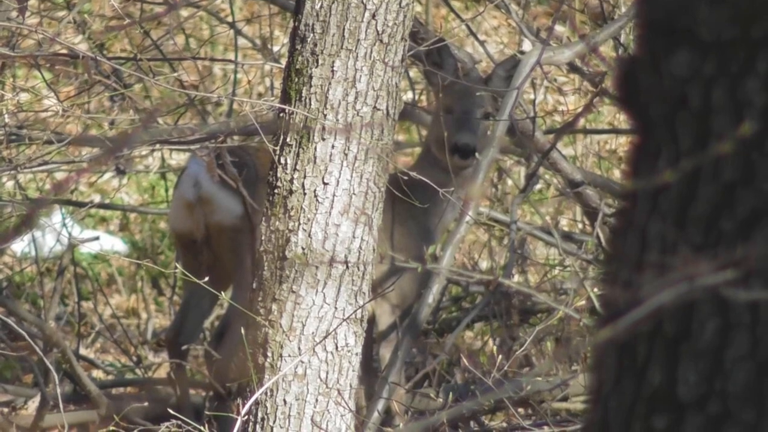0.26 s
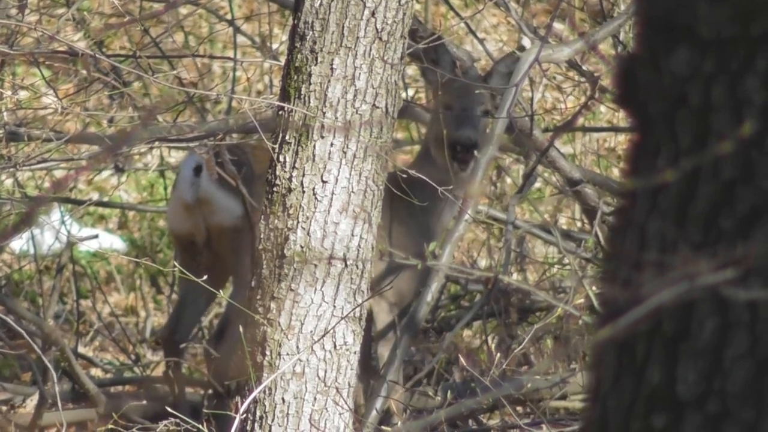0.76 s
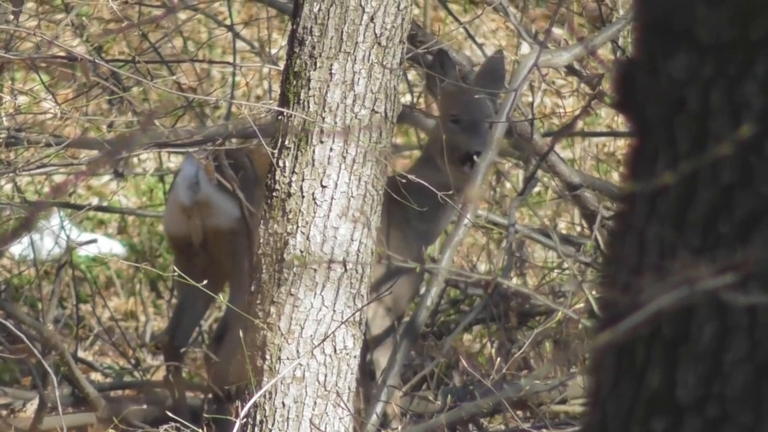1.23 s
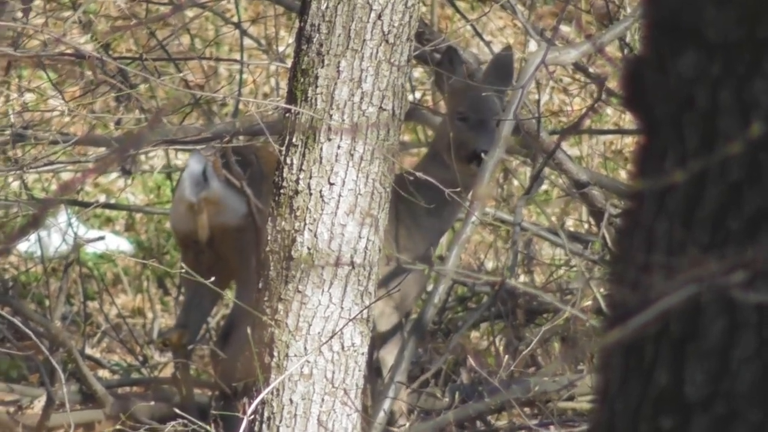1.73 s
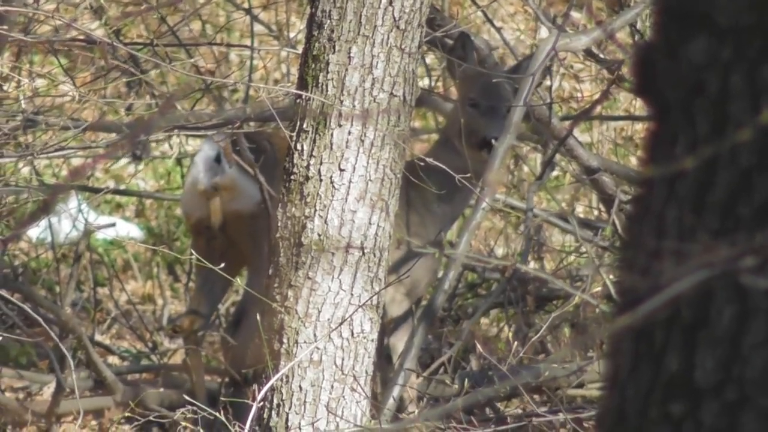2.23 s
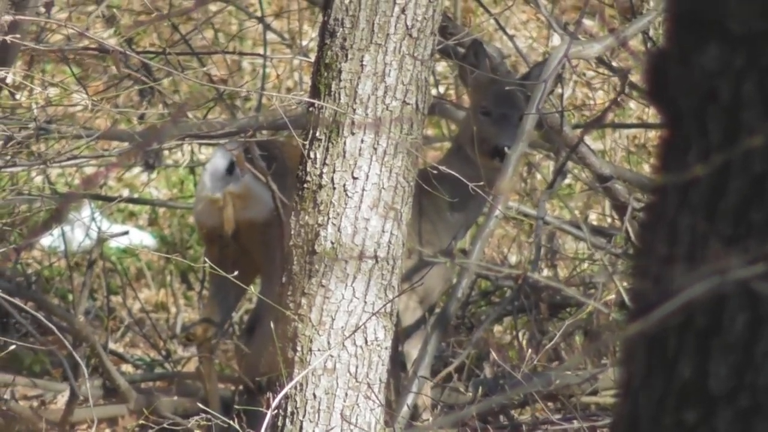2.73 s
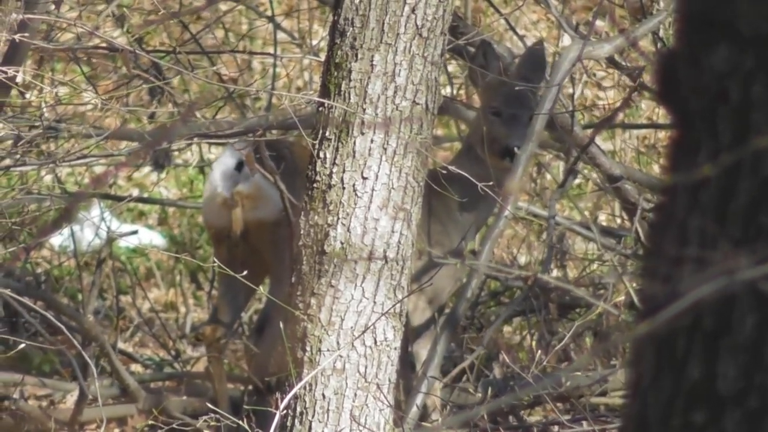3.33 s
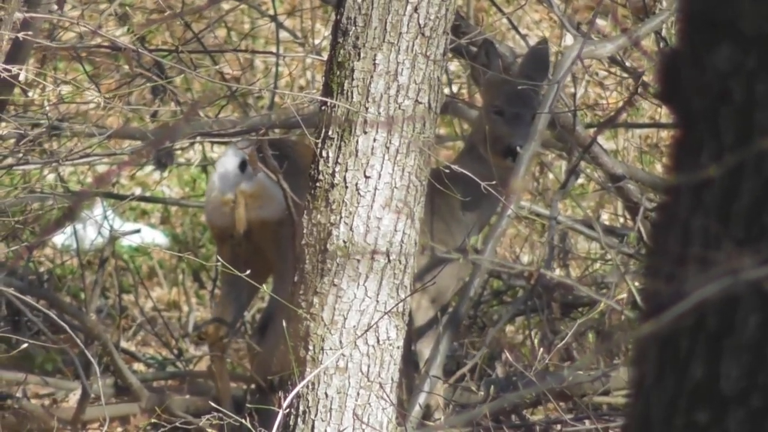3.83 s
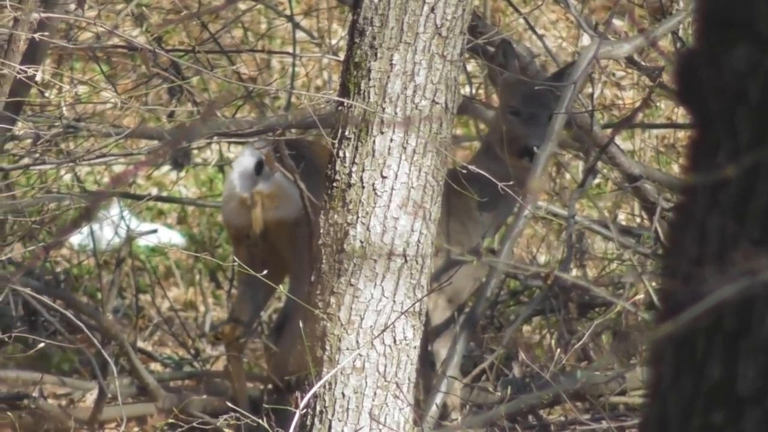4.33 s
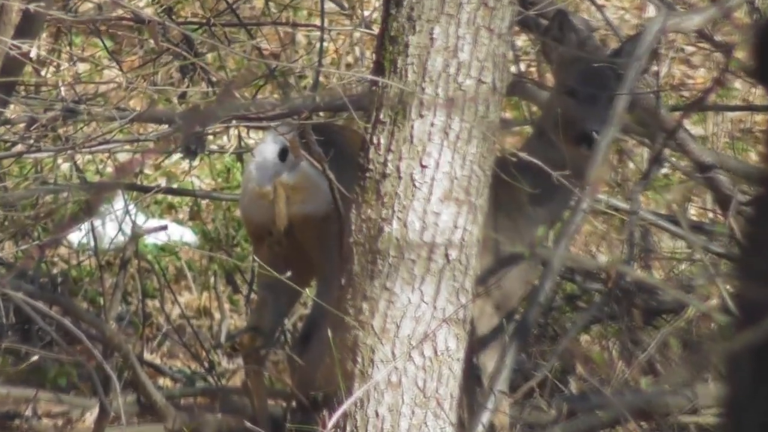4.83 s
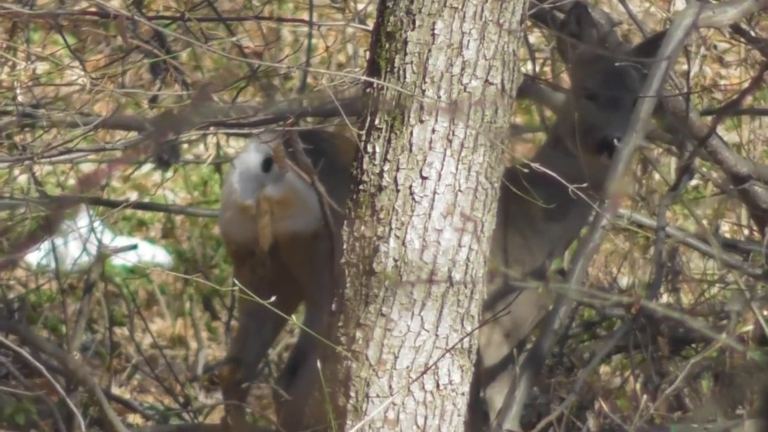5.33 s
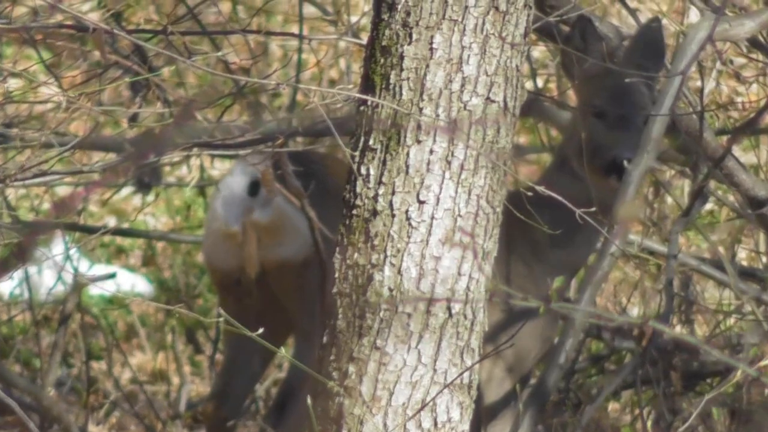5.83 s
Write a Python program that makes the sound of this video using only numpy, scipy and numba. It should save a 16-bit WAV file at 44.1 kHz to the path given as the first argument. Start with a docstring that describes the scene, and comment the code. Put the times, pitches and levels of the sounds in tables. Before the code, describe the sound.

Outdoor camera microphone, quiet background of gentle air and steady hiss. A harsh, dog-like deer bark bursts out nearby early on, its tail spreading through the trees. A more distant deer replies four times, hollow and blurred, at irregular gaps, the last near the end. Tiny bird whistles fall in threes, ending on a nasal note. Small dry camera clicks sit close; late on, a short motor whirr and rapid tiny ticks.

```python
"""Soft air and microphone hiss run throughout, as filtered noise; a small bird's swept sine tones come and go.
After a second a near roe deer grunts and barks once in a bare wood: uneven glottal pulses and air ring its throat.
A camera then clicks now and again, and from 2.3 s a further deer answers four times, mostly as echo.
Around 4.5 s the lens motor whirrs, then the lens steps evenly; clicks, ticks and steps are coloured noise snaps.
Random trunk echoes with a frequency-dependent decay scatter the deer and the bird."""
import sys
import numpy as np
from scipy import signal
from scipy.fft import rfft, irfft
from scipy.io import wavfile
from scipy.ndimage import uniform_filter1d
from numba import njit

SR = 44100
rng = np.random.default_rng(int(sys.argv[2]) if len(sys.argv) > 2 else 0)


def generate_wav(signal):
    """Clip the signal to [-1, 1] and save it as 16-bit WAV at the path in sys.argv[1]."""
    frames = np.transpose(np.atleast_2d(signal))
    scaled = np.clip(frames, -1, 1) * 32767
    pcm = np.round(scaled).astype(np.int16)
    wavfile.write(sys.argv[1], SR, pcm)


N = 268128


def undb(db):
    """Decibels to amplitude gain."""
    return 10 ** (np.asarray(db) / 20)


def unit(x):
    """Scale to rms 1."""
    return x / np.sqrt(np.mean(x ** 2) + 1e-30)


def curve(rows):
    """Rows (time [s], value) joined by straight lines."""
    return np.interp(np.arange(N) / SR, *np.transpose(rows))


def over_hz(points, size):
    """Rows (frequency [Hz], value) read on the FFT grid, linear in log frequency."""
    hz, value = np.transpose(points)
    grid_hz = np.arange(size // 2 + 1) * SR / size
    return np.interp(np.log(grid_hz + 1), np.log(hz), value)


def colour(x, points):
    """Filter by a spectrum of rows (frequency [Hz], gain [dB])."""
    size = x.shape[-1]
    return irfft(rfft(x) * undb(over_hz(points, size)), size)


def add(track, start_s, sound):
    """Mix a sound into a track, cut at the track's end."""
    i = max(int(start_s * SR), 0)
    part = sound[:max(N - i, 0)]
    track[i:i + len(part)] += part


def wobble(size, rate_hz):
    """Random knots at a given rate joined by straight lines, spread near 1."""
    return np.interp(np.arange(size) / SR * rate_hz, np.arange(2000), rng.standard_normal(2000))


# side against mid: (frequency [Hz], gain [dB])
SIDE_COLOUR = [(30, -8), (120, 1), (500, 1.5), (2000, -12), (4500, -46), (7500, -12), (12000, -2)]


def stereo_noise(points):
    """Coloured noise, wide in the bass and the top, narrow between."""
    mid, side = unit(colour(rng.standard_normal((2, N)), points))
    side = colour(side, SIDE_COLOUR)
    return np.array([mid + side, mid - side])


# air spectrum: (frequency [Hz], relative density [dB])
AIR_COLOUR = [(15, -24), (25, -14.5), (59, -4.5), (92, -6.5), (149, -6.5), (294, -11), (331, -9.5),
              (397, -12), (724, -12.5), (1640, -28), (3000, -48), (3900, -54), (6600, -120)]
# hiss spectrum: (frequency [Hz], relative density [dB])
HISS_COLOUR = [(1500, -22.5), (1950, 8), (2600, -2.5), (3600, 4), (5000, -5.5), (6500, 1.5), (7900, 6.5),
               (10000, 2), (15500, 0)]
# swell of both, mean removed in use: (time [s], level [dB])
BACKGROUND_SWELL = [(0.0, -75.5), (0.81, -76), (1.85, -71.5), (2.45, -73.5), (2.73, -72.5), (6.08, -74)]


def background():
    """Soft moving air among the trees and the microphone's hiss, swelling together."""
    air_db, hiss_db, air_follows = -65, -68, 0.88
    swell_db = curve(BACKGROUND_SWELL)
    swell_db = swell_db - np.mean(swell_db)
    air_level_db = air_db + air_follows * swell_db + 0.76 * wobble(N, 4.7)
    air = stereo_noise(AIR_COLOUR) * undb(air_level_db)
    return air + stereo_noise(HISS_COLOUR) * undb(hiss_db + swell_db)


# tail bands: (frequency [Hz], t60 [s], level [dB])
WOOD_BANDS = [(150, 0.99, 2), (408, 2.96, 3), (663, 2.37, 4), (885, 2.36, -4), (1240, 2.37, -0.5),
              (2220, 1.61, 1.5), (3940, 0.99, -10), (9000, 0.34, 1.5)]


def wood(x, direct_db, early_db, early_s, tail_db, build_s, width, beam_db=0):
    """Direct sound, scatter off the nearest trunks, then a long tail that loses its treble first."""
    size = 2 * SR
    t = np.arange(size) / SR
    # trunk echoes of very unequal strength, as mid and side
    echoes = unit(rng.standard_normal((2, size)) * rng.random((2, size)) ** 8)
    spectrum = rfft(echoes)
    band_hz, t60s, band_dbs = np.transpose(WOOD_BANDS)
    # a mouth facing the listener sends less of its upper range into the trees
    band_dbs = band_dbs - beam_db * np.clip((band_hz - 650) / 250, 0, 1)
    tail = 0
    for share, t60, band_db in zip(np.eye(len(t60s)), t60s, band_dbs):
        band = irfft(spectrum * over_hz(np.column_stack([band_hz, share]), size), size)
        tail = tail + undb(band_db) * band * np.exp(-np.log(1000) * t / t60)
    tail = tail * (1 - np.exp(-t / build_s))
    early = echoes * np.exp(-t / early_s) * np.sqrt(2 / early_s)
    mid, side = (undb(early_db) * early + undb(tail_db) * tail) / np.sqrt(SR)
    mid[0] += undb(direct_db)
    response = np.array([mid + width * side, mid - width * side])
    return signal.fftconvolve(x[None], response, axes=1)[:, :N]


def whistle(length_s, glide_hz):
    """A thin, slightly quavering tone bending through start, middle and end pitch."""
    u = np.linspace(0, 1, int(length_s * SR))
    hz = np.polyval(np.polyfit([0, .5, 1], glide_hz, 2), u)
    hz = hz * (1 + 0.0098 * wobble(len(u), 689))
    envelope = np.abs(np.sin(np.pi * u)) ** 0.52
    tone = unit(envelope * np.sin(2 * np.pi * np.cumsum(hz) / SR))
    return undb(2.25 * wobble(len(u), 74)) * tone


# nasal note: (multiple of the fundamental, level [dB])
NASAL_MIX = [(5, -3), (8, 4), (9, -1.5), (10, 0)]


def nasal():
    """A nearly level note of a few high partials, its pitch arching a little."""
    length_s, peak_hz = 0.105, 754.7
    arch = np.abs(np.sin(np.linspace(0, np.pi, int(length_s * SR)))) ** .5
    phase = 2 * np.pi * np.cumsum(peak_hz * (1 + 0.0447 * (arch - 1))) / SR
    partials = sum(undb(db) * np.sin(round(k) * phase) for k, db in NASAL_MIX)
    return unit(arch * partials)


# falling whistles, pitches before the song's factor:
# (time into unstretched song [s], length [s], start [Hz], middle [Hz], end [Hz], level re song [dB])
SONG_WHISTLES = [(0, .115, 7760, 6890, 6490, -1), (0.168, .118, 7520, 6760, 6220, -0.5),
                 (0.352, .073, 7150, 6600, 5200, -1)]
# songs: (time [s], level before wood [dB], whistle pitch factor, note spacing factor)
SONG_TIMES = [(1.152, -63.5, .98, 1.0), (2.352, -63, 1.03, 0.95), (4.997, -60, 1.0, 1.02),
              (5.875, -60, 0.99, 1.03)]
# rising contact calls: (time [s], middle pitch [Hz], level before wood [dB])
CONTACT_PEEPS = [(.002, 7800, -75), (.317, 8000, -70), (.62, 8460, -71), (3.655, 7560, -61.5)]


def bird():
    """Songs of three falling whistles and a nasal note; rising peeps before the first, one between later songs."""
    nasal_after_s, nasal_db = .517, -1
    peep_length_s, peep_rise = .065, 0.02  # rise: share of the pitch either side of the middle
    out = np.zeros(N)
    for start_s, db, pitch, stretch in SONG_TIMES:
        for after_s, length_s, *glide_hz, note_db in SONG_WHISTLES:
            note = whistle(length_s, pitch * np.array(glide_hz))
            add(out, start_s + stretch * after_s, undb(db + note_db) * note)
        add(out, start_s + stretch * nasal_after_s, undb(db + nasal_db) * nasal())
    for start_s, hz, db in CONTACT_PEEPS:
        glide_hz = hz * (1 + peep_rise * np.array([-1, 0, 1]))
        add(out, start_s, undb(db) * whistle(peep_length_s, glide_hz))
    return wood(out, direct_db=-7, early_db=-13.0, early_s=0.013, tail_db=9.5, build_s=0.03, width=0.021)


@njit
def svf(x, hz, width_hz):
    """State-variable band-pass with a moving centre, gain 1 there."""
    y, band, low = np.empty(len(x)), 0., 0.
    for i in range(len(x)):
        g, k = np.tan(np.pi * hz[i] / SR), width_hz / hz[i]
        v = (band + g * (x[i] - low)) / (1 + g * (g + k))
        band, low, y[i] = 2 * v - band, low + 2 * g * v, k * v
    return y


def resonate(x, hz, width_hz):
    """A resonance applied twice, for steep skirts."""
    centre_hz = np.minimum(hz * np.ones(len(x)), SR / 2 - 2000)
    once = svf(x, centre_hz, float(width_hz))
    return svf(once, centre_hz, float(width_hz))


# throat opening before a bark:
# (time [s], length [s], level before wood [dB], centre [Hz], width per pass [Hz])
GRUNT_PUFFS = [(1.005, 0.035, -45.5, 820, 450), (3.898, 0.12, -58, 246, 170),
               (5.712, 0.095, -53.5, 258, 224)]


def grunts():
    """Short rough puffs, band-passed noise, that lead into barks."""
    out = np.zeros(N)
    for start_s, length_s, db, hz, width_hz in GRUNT_PUFFS:
        size = int(length_s * SR)
        puff = resonate(rng.standard_normal(SR)[:size], hz, width_hz) * np.hanning(size)
        add(out, start_s, undb(db) * unit(puff))
    return wood(out, direct_db=-9.5, early_db=-9.5, early_s=0.17, tail_db=-9, build_s=0.061, width=0.17)


def bark(row, throat, pitch_hz, chest_db, release_s, first_width_hz, jaw_drop, jitter, rasp, growl_db):
    """Uneven glottal pulses and puffs of air ring the throat while the jaw opens and closes."""
    _, length_s, db, first_hz, upper_db, attack_s = row
    size = int(length_s * SR)
    t = np.arange(size) / SR
    jaw = np.sin(np.pi * (t / length_s) ** .85)
    fold_hz = pitch_hz * (.95 + .06 * jaw) * (1 + jitter * wobble(size, 400))
    phase = np.cumsum(fold_hz) / SR
    pulses = np.diff(np.floor(phase), prepend=0)
    pulses = unit(pulses * undb(2.2 * wobble(size, 143.5)))
    # air hisses while the folds are open, afresh at every narrowing of the throat
    air = rng.standard_normal((len(throat) + 2, SR))[:, :size]
    puffs = air * np.exp(-(phase % 1) / 0.73)
    first, low, *upper = pulses + rasp * unit(puffs)
    # starts as a rasp; the first resonance blooms later and sinks as the jaw closes
    bloom = undb(-7 * np.clip(1 - t / 0.081, 0, 1))
    voice = bloom * resonate(first, first_hz * (1 - jaw_drop * (1 - jaw)), first_width_hz)
    for source, (hz, width_hz, mode_db) in zip(upper, throat):
        voice += undb(mode_db + upper_db) * resonate(source, hz * (0.948 + 0.062 * jaw), width_hz)
    # steady lung pressure evens out the loudness
    voice /= np.sqrt(uniform_filter1d(voice ** 2, size=900) + 1e-18)
    # fundamental and low growl come through the chest wall
    growl = unit(resonate(low, 244, 460))
    chest = unit(np.sin(2 * np.pi * phase)) + undb(growl_db) * growl
    effort = np.clip(t / attack_s, 0, 1) * np.clip((length_s - t) / release_s, 0, 1)
    return effort * (undb(db) * voice + undb(chest_db) * chest)


# barks: (time [s], length [s], voice level before wood [dB],
#         first resonance with jaw open [Hz], other resonances' gain [dB], attack [s])
NEAR_CALLS = [(1.054, .28, -27, 852, -4, 0.027)]
# other resonances: (nominal centre [Hz], width per pass [Hz], gain [dB])
NEAR_MODES = [(650, 175, -3), (1028, 263, -3.4), (1315, 290, -7.5), (2003, 350, -15), (2345, 200, -19),
              (3190, 390, -25.5), (3770, 360, -30), (8200, 4200, -42.5)]


def near_deer():
    """One loud, bright bark towards the listener."""
    out = np.zeros(N)
    for row in NEAR_CALLS:
        sound = bark(row, NEAR_MODES, pitch_hz=166.6, chest_db=-49.5, release_s=.17, first_width_hz=130,
                     jaw_drop=0.25, jitter=.1, rasp=3.4, growl_db=-4)
        add(out, row[0], sound)
    return wood(out, direct_db=-4.5, early_db=-9.0, early_s=0.044, tail_db=5.0, build_s=0.14,
                width=0.28, beam_db=3.5)


def tick(points, decay_s):
    """A short dry noise snap of the given colour, rms 1 over its first 10 ms."""
    t = np.arange(2048) / SR
    burst = rng.standard_normal(len(t)) * np.exp(-t / decay_s) * np.minimum(t / 0.00068, 1)
    snap = colour(burst, points)
    return snap / np.sqrt(np.mean(snap[:SR // 100] ** 2))


# camera snap: (frequency [Hz], gain before treble tilt [dB])
SNAP_COLOUR = [(300, -2.5), (1200, -2.5), (2000, -2), (2900, -10), (3800, -0.5), (5000, -8), (6800, 4.5),
               (9000, 4.5), (12000, -12), (16000, -6)]


def click(treble_db):
    """A snap of the camera, tilted brighter or duller above 3 kHz."""
    tilted = [(hz, db + treble_db * np.clip(np.log2(hz / 3000), 0, 1)) for hz, db in SNAP_COLOUR]
    return tick(tilted, decay_s=.0035)


# clear camera clicks, bright from the housing and dull from the lens motor:
# (time [s], level [dB], treble [dB])
CAMERA_CLICKS = [(1.339, -60.5, -4), (2.162, -53, -8), (2.199, -61, 6), (2.901, -56.5, -6),
                 (3.929, -62.5, -5), (4.542, -55, -17), (4.557, -58, -25), (4.857, -61.5, -11),
                 (6.036, -61.5, -6)]
# faint random ticking, from the grip, then the zoom: (start [s], end [s], mean level [dB], treble [dB])
TICK_SPELLS = [(2.2, 2.852, -72, 10), (4.598, 5.2, -66.5, -6), (5.2, 5.903, -68, -13)]
# motor runs: (time [s], length [s], settled level [dB])
MOTOR_RUNS = [(4.54, 0.62, -69.5), (5.118, 0.16, -69)]
# whirr spectrum: (frequency [Hz], gain [dB])
MOTOR_COLOUR = [(100, 5), (290, 10.5), (450, -28), (1500, -9), (1950, 4.5), (2500, -6.5), (3700, 0.5),
                (5000, -12.5), (6500, -4.5), (8300, 2.5), (10500, -17), (16000, -32)]
# lens step runs: (start [s], end [s], rate [steps/s], mean level [dB])
LENS_STEPS = [(5.201, 5.65, 25, -66), (5.661, 5.78, 50, -66)]
# step spectrum: (frequency [Hz], gain [dB])
LENS_STEP_COLOUR = [(400, 12.5), (1300, -8), (2100, 8.5), (3000, 1), (4000, -3), (5200, -4), (7000, -5),
                    (12000, -11)]


def camera():
    """Clicks and ticks, a noise whirr of the zoom motor, then even steps of the lens."""
    attack_s, release_s, surge_db, settle_s = .02, .05, 8, 0.086
    drive = np.zeros(N)
    for start_s, length_s, db in MOTOR_RUNS:
        t = np.arange(int(length_s * SR)) / SR
        running = np.clip(t / attack_s, 0, 1) * np.clip((length_s - t) / release_s, 0, 1)
        add(drive, start_s, running * undb(db + surge_db * np.exp(-t / settle_s)))
    whirr = unit(colour(rng.standard_normal(N), MOTOR_COLOUR))
    out = drive * undb(2.3 * wobble(N, 140)) * whirr
    for start_s, db, treble_db in CAMERA_CLICKS:
        add(out, start_s, undb(db) * click(treble_db))
    for start_s, end_s, db, treble_db in TICK_SPELLS:
        for share in rng.random(size=5):
            level_db = db + 0.5 * rng.standard_normal()
            add(out, start_s + share * (end_s - start_s), undb(level_db) * click(treble_db))
    for start_s, end_s, rate_hz, db in LENS_STEPS:
        for when_s in np.arange(start_s, end_s, 1 / rate_hz):
            level_db = db + rng.standard_normal()
            add(out, when_s, undb(level_db) * tick(LENS_STEP_COLOUR, decay_s=.0028))
    return out


# barks: (time [s], length [s], voice level before wood [dB],
#         first resonance with jaw open [Hz], other resonances' gain [dB], attack [s])
FAR_CALLS = [(2.32, 0.28, -39, 686, -3.5, 0.068), (3.015, 0.24, -42, 650, -2, 0.069),
             (3.925, .24, -44, 643, 0, 0.047), (5.735, 0.27, -44, 627, 2, 0.046)]
# other resonances: (nominal centre [Hz], width per pass [Hz], gain [dB])
FAR_MODES = [(573, 147, -10), (915, 260, -9.5), (1139, 150, -7.5), (1289, 140, -14), (2040, 310, -23.5),
             (2255, 450, -29.5), (3500, 1300, -52)]


def far_deer():
    """Duller answers that arrive mostly as echo."""
    out = np.zeros(N)
    for row in FAR_CALLS:
        sound = bark(row, FAR_MODES, pitch_hz=162.5, chest_db=-62.5, release_s=0.096, first_width_hz=120.5,
                     jaw_drop=0.099, jitter=.16, rasp=3.54, growl_db=2.0)
        add(out, row[0], sound)
    return wood(out, direct_db=-6.0, early_db=-12, early_s=0.062, tail_db=8.0, build_s=0.041, width=0.18)


# deer placement: (frequency [Hz], left minus right [dB])
DEER_BALANCE = [(150, 6), (350, -4), (700, -2), (1100, -3), (2000, 0), (4000, 0.5)]


def scene():
    """Deer balanced left to right by frequency, bird and camera in the middle."""
    left, right = grunts() + near_deer() + far_deer()
    left = colour(left, [(hz, db / 2) for hz, db in DEER_BALANCE])
    right = colour(right, [(hz, -db / 2) for hz, db in DEER_BALANCE])
    return background() + bird() + np.array([left, right]) + camera()


def record(dry):
    """The camera cuts the top: a steep elliptic low-pass."""
    top_hz = 15800
    return signal.sosfilt(signal.ellip(10, .1, 70, top_hz, fs=SR, output="sos"), dry)


dry = scene()
out = record(dry)
generate_wav(out)
```